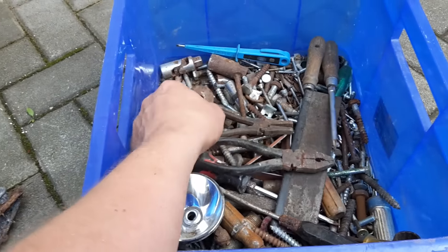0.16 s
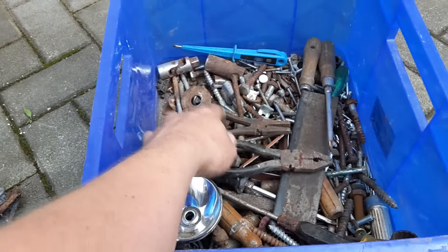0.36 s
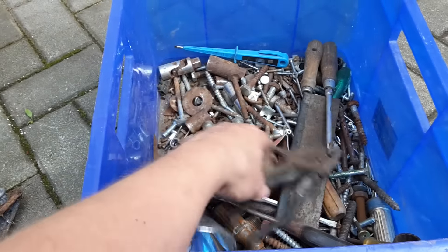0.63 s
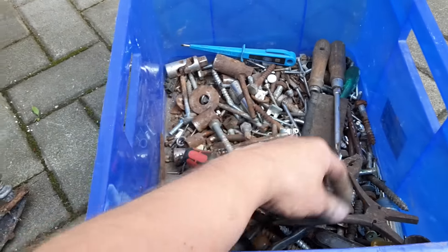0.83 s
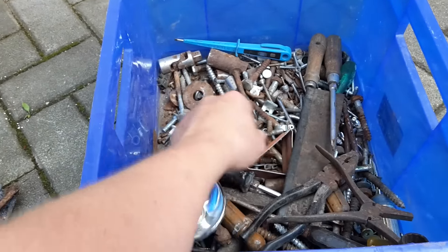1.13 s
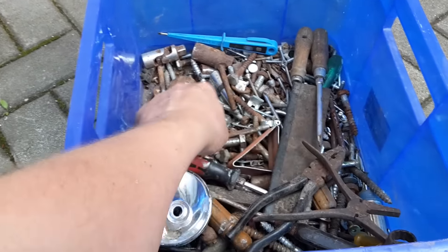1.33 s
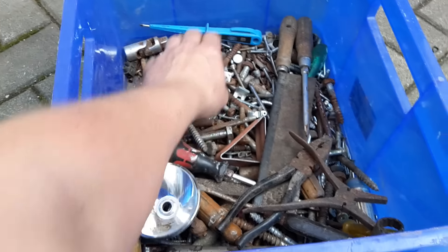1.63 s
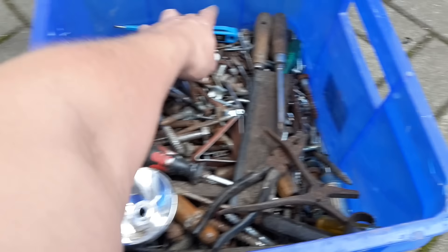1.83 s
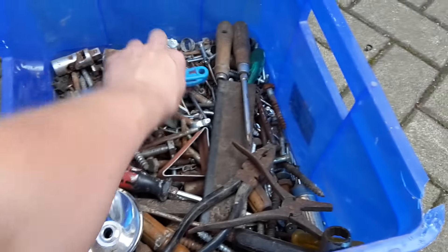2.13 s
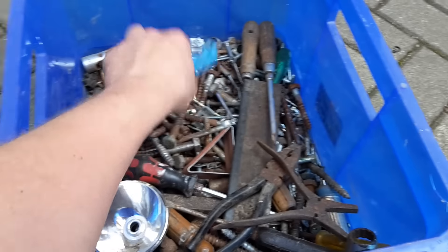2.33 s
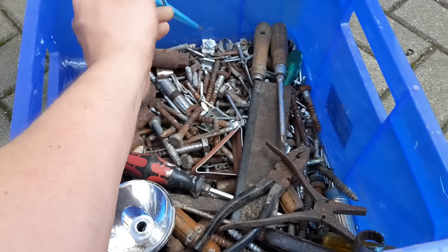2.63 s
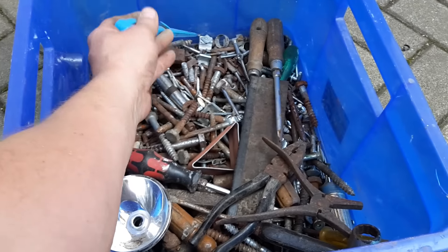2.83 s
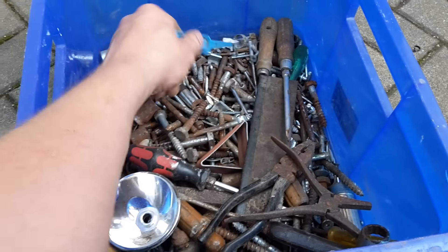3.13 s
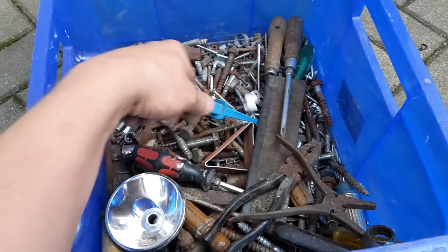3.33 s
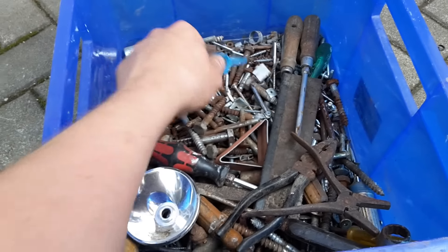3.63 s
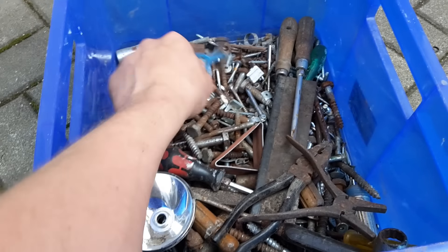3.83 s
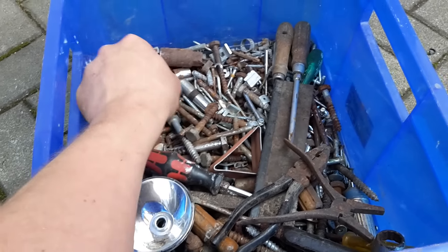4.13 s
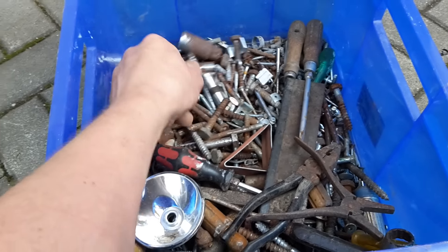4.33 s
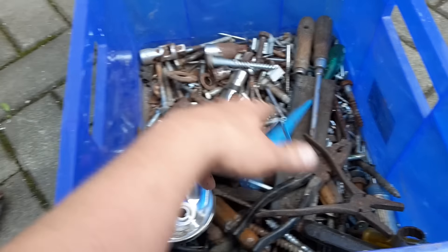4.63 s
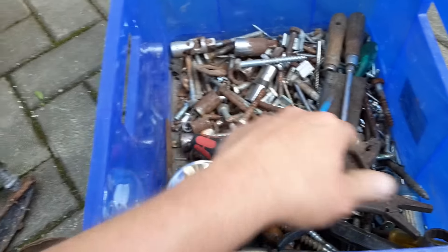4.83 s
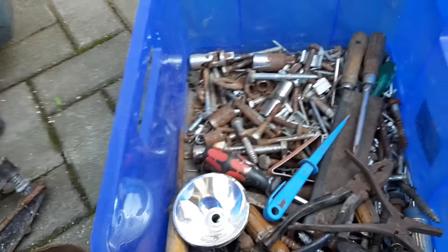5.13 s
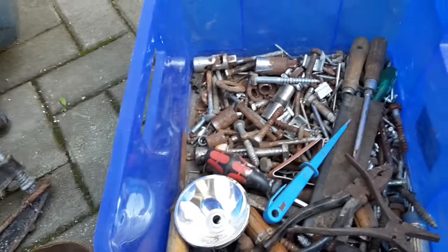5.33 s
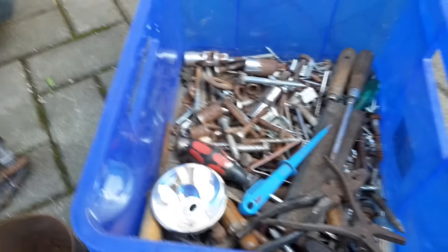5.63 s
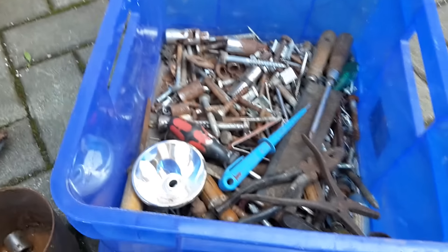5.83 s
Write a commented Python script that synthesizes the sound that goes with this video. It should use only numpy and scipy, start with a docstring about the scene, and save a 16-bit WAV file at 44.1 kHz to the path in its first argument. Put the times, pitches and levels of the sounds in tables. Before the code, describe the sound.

Close bursts of bright metal clinking and dull plastic thuds as someone digs through a crate of screws and tools outdoors.

```python
"""Steel screws clink and a plastic crate thuds as a hand rummages through bolts and old tools, close by,
outdoors. Each hit rings a small part, a tool and the heap beneath; each stroke of the hand sets off
hundreds of tiny contacts. Dropped pliers rattle and rock, and a few loose pieces ring on.
Under it lie a faint hum, low rumble and thin hiss, with two very faint far notes near the end."""
import sys
import numpy as np
from scipy import signal
from scipy.fft import rfft, irfft, next_fast_len
from scipy.io import wavfile

SR = 44100
rng = np.random.default_rng(int(sys.argv[2]) if len(sys.argv) > 2 else 0)


def master(y):
    """Save y as 16-bit WAV."""
    cut = np.clip(np.atleast_2d(y).T, -1, 1)
    pcm = np.round(cut * 32767)  # scale
    wavfile.write(sys.argv[1], SR, pcm.astype(np.int16))


N = 263277
TIME_S = np.arange(N) / SR


def amp(db):
    return 10 ** (np.asarray(db) / 20)


def unit_rms(x):
    return x / np.sqrt(np.mean(x ** 2) + 1e-20)


def at_hz(curve, hz):
    """Curve value on a log-frequency axis."""
    knots_hz, values = np.transpose(curve)
    return np.interp(np.log(hz + 1), np.log(knots_hz + 1), values)


def pan(db):
    """Stereo gains for a left-minus-right level."""
    gains = amp([[db / 2], [-db / 2]])
    return gains / gains.mean()


def add(mix, start_s, sound):
    span = mix[:, max(round(start_s * SR), 0):][:, :sound.shape[1]]
    span += sound[:, :span.shape[1]]


def highpass(x, hz):
    return signal.sosfilt(signal.butter(2, hz, "high", fs=SR, output="sos"), x)


def drift(per_s):
    """Straight lines between Gaussian random values."""
    knots = rng.standard_normal(4000)
    return np.interp(TIME_S * per_s, np.arange(len(knots)), knots)


def noise(spectrum, channels=2):
    """Steady shaped noise, unit rms."""
    size = next_fast_len(N)
    white = rfft(rng.standard_normal((channels, size)))
    gains = amp(at_hz(spectrum, np.fft.rfftfreq(size, 1 / SR)))
    return unit_rms(irfft(white * gains, size)[:, :N])


# far notes: (start [s], length [s], base pitch [Hz], peak level [dB])
FAR_NOTES = [(5.072, 0.71, 5950, -87), (5.336, 0.34, 4940, -94.5)]
def far_whistle(waver=0.0065, arch=0.068):
    """Thin, unsteady notes; pitch and level rise toward the middle of each."""
    out = np.zeros(N)
    for start_s, length_s, hz, db in FAR_NOTES:
        progress = np.clip((TIME_S - start_s) / length_s, 0, 1)
        pitch_hz = hz * (1 + waver * drift(per_s=46) + arch * np.sin(np.pi * progress))
        swell = np.sqrt(np.interp(progress, [0, 0.5, 1], [0, 1, 0]))
        out += amp(db) * swell * np.sin(2 * np.pi * np.cumsum(pitch_hz) / SR)
    return out


# hiss spectrum: (frequency [Hz], relative level [dB])
HISS_SPECTRUM = [(6000,-18.5),(8500,-25.5),(9700,5.5),(11500,2.5),(13500,-8),(15500,-9.5)]
# hiss envelope: (time [s], level [dB])
HISS_ENVELOPE = [(0, -91.5), (.3, -75.5), (0.498, -81.5), (1.85, -75.5), (2.1, -67.5), (2.68, -65.5),
                 (2.751, -59), (2.86, -73), (3.7, -67), (4.25, -93.5), (4.6, -79), (5.05, -67),
                 (5.24, -57.5), (5.38, -60.5), (5.44, -66), (5.8, -74), (5.97, -54.5)]
def hiss(gain_db=-1):
    """Thin, grainy hiss that swells and flutters."""
    flutter_db = 2 * drift(per_s=25) + 2 * drift(per_s=400)
    swell_db = np.interp(TIME_S, *np.transpose(HISS_ENVELOPE))
    return noise(HISS_SPECTRUM) * amp(gain_db + swell_db + flutter_db)


# hum tones: (frequency [Hz], relative level [dB])
HUM_TONES = [(59.2, -72.5), (123.8, -68.5), (199.2, -69), (220.7, -61.5), (581.4, -77), (662.1, -83),
             (1109, -81.5)]
# rumble spectrum: (frequency [Hz], relative level [dB])
RUMBLE_SPECTRUM = [(22,-27.5),(38,-11.5),(52,-1.5),(100,-6),(150,-4.5),(230,-4),(400,-11.5),(600,-18),(850,-26),(1100,-24),(1500,-34.5),(2300,-35),(3400,-52.5),(7000,-79.5)]
# envelope of both: (time [s], gain [dB])
HUM_ENVELOPE = [(0, -70), (.35, -62.5), (.9, -61), (1.2, -60), (1.9, -56), (3.4, -61.5), (3.7, -66),
                (4.25, -71), (5.05, -60.5), (5.97, -54)]
def distant_hum(tone_gain_db=59, waver_rad=0.5):
    """Wavering tones in low rumble; both swell and sink slowly."""
    hum = np.zeros(N)
    for hz, db in HUM_TONES:
        phase = 2 * np.pi * hz * TIME_S + waver_rad * drift(per_s=4.9)
        hum += amp(db + tone_gain_db) * np.sqrt(2) * np.sin(phase)
    rumble = noise(RUMBLE_SPECTRUM, channels=1) + 0.22 * noise(RUMBLE_SPECTRUM)
    swell_db = np.interp(TIME_S, *np.transpose(HUM_ENVELOPE))
    return (hum + rumble) * amp(swell_db) * pan(db=-3)


def echoes(x, t60_s, gain_db, low_cut_hz):
    """Sparse reflections of random sign, different at each microphone."""
    t = np.arange(SR // 2) / SR
    signs = rng.choice([-1., 1.], (2, len(t)))
    arrives = (rng.random((2, len(t))) < 0.08) & (t > 0.002)
    taps = signs * arrives * amp(-60 * t / t60_s)
    taps /= np.linalg.norm(taps, axis=1, keepdims=True)
    return amp(gain_db) * signal.fftconvolve(highpass(x, low_cut_hz), taps, axes=1)[:, :N]


# mode spread between microphones: (frequency [Hz], rms phase difference [rad])
MIC_SPREAD = [(100,.2),(450,.22),(800,.9),(1400,1.4),(4000,1.8),(11000,2.4)]
def modes(hz, t60_s, sizes, block=112):
    """Decaying sines, block**2 samples long; phase and strength differ at each microphone."""
    poles = 2j * np.pi * hz - np.log(1000) / np.maximum(t60_s, 0.004)
    imbalance, lead_rad = at_hz(MIC_SPREAD, hz) * rng.standard_normal((2, len(hz)))
    mic_gains = sizes * np.exp(0.5 * np.outer([1, -1], 0.35 * imbalance + 1j * lead_rad))
    steps = np.outer(np.arange(block) / SR, poles)
    block_starts = mic_gains[:, None] * np.exp(steps * block)
    return (block_starts @ np.exp(steps).T).imag.reshape(2, -1)


def part(spectrum, t60_s, count, main_hz=1000., main_gain=0.):
    """Irregular object: modes scattered under a spectrum, decays around t60_s, optional main mode."""
    low_hz, high_hz = spectrum[0][0], spectrum[-1][0]
    hz = low_hz + (high_hz - low_hz) * (np.arange(count) + rng.random(count)) / count
    life = np.exp(rng.uniform(-0.94, 1.0, count))  # the support damps some modes
    sizes = amp(at_hz(spectrum, hz)) * rng.standard_normal(count) / np.sqrt(life)
    sizes /= np.linalg.norm(sizes)
    return modes(np.append(hz, main_hz), t60_s * np.append(life, 1.3), np.append(sizes, main_gain))


def struck(body, rise_s, gap_s, rebounds, attack_samples=260):
    """One contact plus irregular, fading rebounds; unit rms over the attack."""
    body = body * (1 - np.exp(-np.arange(body.shape[1]) / (SR * rise_s)))
    gaps, forces = rng.uniform(0.2, 1.4, (2, rebounds))
    forces *= 0.73 ** np.arange(1, rebounds + 1)
    out = body.copy()
    for delay_s, force in zip(np.cumsum(gaps) * gap_s, forces):
        add(out, delay_s, force * body)
    return out / np.sqrt(np.mean(out[:, :attack_samples] ** 2))


# hand strokes: (touch [s], full push [s], release [s], jingle [dB], grind [dB], rumble [dB], scrape [dB])
STROKES = [(0.148, 0.163, 0.25, -69, -52, -51, -56), (.57, 0.637, 0.68, -52, -55, -48, -52),
           (.7, 0.79, 1, -49, -51, -51, -63.5), (1.967, 2.126, 2.15, -43, -44, -39.5, -61),
           (2.171, 2.258, 2.397, -39, -44, -46, -46), (2.9, 2.913, 2.894, -55, -69.5, -52.5, -69.5),
           (3.19, 3.353, 3.468, -39, -53.5, -54, -55.5), (3.797, 3.943, 3.964, -42.5, -49.5, -46.5, -60),
           (4.331, 4.527, 4.6, -37, -45.5, -40.5, -54), (4.66, 4.68, 4.96, -68.5, -54, -50, -69.5)]
def contacts(spectrum, stroke_db, push_slope, t60_s, per_s, rise_s, spread_db, count=32):
    """Many tiny contacts per stroke: the push builds and holds, then the heap settles."""
    build_db, settle_db_per_s, settle_s = 16, 128, 0.22
    hits = [struck(part(spectrum, t60_s, count=24), rise_s, gap_s=0.0024, rebounds=2)[:, :SR // 12]
            for _ in range(count)]
    hits = [hit / np.linalg.norm(hit) for hit in hits]
    out = np.zeros((2, N))
    for (touch_s, full_s, release_s, *_), db in zip(STROKES, stroke_db):
        slots_s = np.arange(touch_s, release_s + settle_s, 1 / per_s)
        late, pick, force = np.random.default_rng(rng.integers(1 << 30)).random((len(slots_s), 3)).T
        times_s = slots_s + late * 2 / per_s
        push_db = np.interp(times_s, [touch_s, full_s], [-build_db, 0])
        push_db -= settle_db_per_s * np.maximum(times_s - release_s, 0)
        sizes = unit_rms(amp(spread_db * force ** 2)) * amp(db + push_slope * push_db)
        for time_s, size, k in zip(times_s, sizes, (pick * count).astype(int)):
            add(out, time_s, hits[k] * size * np.sqrt(2 * SR / per_s))
    return out


# spectra of the struck objects: (frequency [Hz], relative level [dB])
SCREW_SPECTRUM = [(7500,-45.5),(8700,-11),(9700,3),(11500,2),(12800,-2.5),(14000,-7.5),(15400,-5.5),(16400,-30)]
TOOL_SPECTRUM = [(2800,6.5),(3700,-1.5),(4500,0.5),(5200,-3.5),(6000,-1.5),(7200,-2.5),(8500,11.5)]
HEAP_SPECTRUM = [(650,-2),(950,4.5),(1350,8),(1900,2),(2600,1),(3300,-20.5)]
CRATE_SPECTRUM = [(70,-13),(100,4),(180,2.5),(290,8.5),(420,-2.5),(560,-2),(800,-12)]
def stirring():
    """Screws jingle, tools scrape, threads and rust grind, and the crate rumbles along."""
    jingle_db, grind_db, rumble_db, scrape_db = np.transpose(STROKES)[3:]
    jingle = contacts(SCREW_SPECTRUM, jingle_db + 1, push_slope=1.5,
                      t60_s=0.03, per_s=220, rise_s=0.0003, spread_db=19)
    scrape = contacts(TOOL_SPECTRUM, scrape_db - 1, push_slope=1.8,
                      t60_s=0.03, per_s=300, rise_s=0.0004, spread_db=15)
    grind = contacts(HEAP_SPECTRUM, grind_db + 1, push_slope=1,
                     t60_s=0.016, per_s=320, rise_s=0.0005, spread_db=17)
    rumble = contacts(CRATE_SPECTRUM, rumble_db - 2, push_slope=0.86,
                      t60_s=0.06, per_s=120, rise_s=0.003, spread_db=11)
    return jingle + scrape * pan(db=-5) + grind * pan(db=-7) + rumble * pan(db=-2)


# wall spectrum: (frequency [Hz], relative level [dB])
WALL_SPECTRUM = [(420,-1),(560,-5.5),(720,-10),(1000,1),(1300,0.5),(1700,-9.5),(2300,-15.5),(3000,-25.5)]
# crate modes: (frequency [Hz], relative level [dB], t60 [s])
CRATE_MODES = [(98,-12,0.2),(316,-6,0.13),(341,-7,0.11),(556.5,-14.5,0.097)]
# blows on the crate: (time [s], thud level [dB], panel mode [Hz], wall clack level [dB])
CRATE_BLOWS = [(0.144, -36.5, 219, -68.5), (0.17, -32, 256, -52), (.867, -25.5, 418, -25.5),
               (.876, -26, 580, -32), (0.903, -40.5, 281.5, -36), (1.909, -24.5, 173.5, -49),
               (1.99, -28, 275, -51.5), (2.025, -28, 289, -36.5), (2.04, -37, 317, -32.5),
               (2.315, -31.5, 314, -38), (2.902, -30, 288, -44.5), (2.935, -32, 305.6, -37.5),
               (3.193, -35, 237, -37), (3.975, -32, 256, -48.5), (4.063, -42.5, 264, -52),
               (4.491, -38, 287, -59), (4.51, -25.5, 191, -33.5), (4.727, -27.5, 278.5, -44),
               (5.079, -56.5, 223, -45), (5.159, -60.5, 207.2, -46.5)]
def crate_knocks(thud_gain_db=-3.5, wall_gain_db=-4.5):
    """Heavy pieces hit the plastic floor, which thuds while the walls give a dull clack."""
    out = np.zeros((2, N))
    mode_hz, mode_db, mode_t60_s = np.transpose(CRATE_MODES)
    for time_s, thud_db, panel_hz, clack_db in CRATE_BLOWS:
        floor = part(CRATE_SPECTRUM, t60_s=0.054, count=22, main_hz=panel_hz, main_gain=1.4)
        floor += modes(mode_hz, mode_t60_s, amp(mode_db))
        thud = struck(floor, rise_s=0.00051, gap_s=0.00012, rebounds=1, attack_samples=440)
        wall = part(WALL_SPECTRUM, t60_s=0.039, count=44)
        clack = struck(wall, rise_s=0.00035, gap_s=0.0025, rebounds=3)
        blow = amp(thud_db + thud_gain_db) * thud * pan(db=-2)
        blow += amp(clack_db + wall_gain_db) * clack * pan(db=-7.5)
        add(out, time_s, highpass(blow, 0.36 * panel_hz))  # a small panel radiates little bass
    return out


# clack and jaw-tick spectra: (frequency [Hz], relative level [dB])
PLIERS_SPECTRUM = [(700, -11), (950, 3.5), (1300, 5), (1700, -11), (2300, -17)]
JAW_SPECTRUM = [(5300, -5), (6200, 16), (7500, -3), (9500, 16.5), (11500, 8.5), (14500, -21)]
# taps on the tools beneath: (time [s], level [dB])
PLIERS_TAPS = [(.928, -39), (0.95, -34.5), (.98, -49), (1.009, -35), (1.024, -33), (1.046, -38),
               (1.11, -42.5), (1.144, -44.5), (1.183, -54.5), (1.272, -55), (1.438, -59.5), (1.454, -52.5),
               (1.568, -54.5), (1.702, -59), (1.817, -57)]
def pliers(tick_gain_db=-11, tick_slope=1.37, t60_s=0.018, clack_cutoff_hz=2500):
    """Dropped pliers rattle, then rock gently: dull clacks, with a bright tick that favours hard taps."""
    clacks, ticks = np.zeros((2, 2, N))
    tap = dict(rise_s=0.00072, gap_s=0.001, rebounds=2)
    body = unit_rms(part(PLIERS_SPECTRUM, t60_s, count=36))
    hardest_db = max(db for _, db in PLIERS_TAPS)
    for time_s, db in PLIERS_TAPS:
        variation = unit_rms(part(PLIERS_SPECTRUM, t60_s, count=36))
        add(clacks, time_s, amp(db) * struck(body + variation, **tap))
        tick_db = hardest_db + tick_slope * (db - hardest_db) + tick_gain_db
        add(ticks, time_s, amp(tick_db) * struck(part(JAW_SPECTRUM, t60_s, count=48), **tap))
    dull = signal.sosfilt(signal.butter(4, clack_cutoff_hz, fs=SR, output="sos"), clacks)
    return dull * pan(db=-8.5) + ticks * pan(db=-11.5)


# free-lying pieces: (time [s], frequency [Hz], level [dB], t60 [s])
LOOSE_RINGS = [(.166, 11000, -31, 0.18), (.635, 6190, -31.5, 0.06), (.853, 7330, -40, 0.23),
               (.867, 453, -22, 0.045), (.887, 3047, -31, 0.055), (.951, 11580, -30, 0.13),
               (1.455, 14850, -59.5, .35), (1.455, 12450, -54.5, 0.11), (1.455, 8180, -67, 0.12),
               (1.455, 4980, -81, .15), (2.144, 11030, -23.5, 0.21), (2.215, 12245, -26, 0.15),
               (2.216, 13110, -21, 0.15), (2.286, 4318, -37.5, 0.37), (2.308, 11850, -13.5, 0.071),
               (2.384, 14740, -47, .15), (2.452, 4950, -45.5, 0.078), (3.33, 12870, -29, 0.22),
               (3.37, 4130, -47, 0.11), (3.39, 4860, -42.5, 0.095), (3.438, 12530, -30.5, 0.21),
               (3.532, 8446, -67.5, .7), (4.025, 15000, -36.5, 0.16), (4.364, 5310, -63.5, 1),
               (4.622, 8280, -39, 0.53), (4.823, 2857, -29.5, 0.085), (4.869, 2784, -34.5, 0.042),
               (4.919, 11070, -32, 0.16), (4.92, 4607, -30.5, 0.035), (4.973, 4650, -47.5, 0.032),
               (5.077, 2805, -46, 0.026)]
def loose_pieces(left_lag_rad=0.85):
    """Washers, bolts and tools ring on in single clear modes, reaching the right microphone first."""
    out = np.zeros((2, N))
    t = np.arange(SR // 2) / SR
    for time_s, hz, db, t60_s in LOOSE_RINGS:
        phase = np.maximum(2 * np.pi * hz * t - [[left_lag_rad], [0]], 0)
        add(out, time_s, amp(db - 60 * t / t60_s) * np.sin(phase))
    return out


# steel-on-steel hits: (time [s], clink level [dB], main mode [Hz], heap clack level [dB], clink pan [dB])
STEEL_HITS = [(0.146, -29, 10630, -49.5, 1), (0.167, -22.5, 9600, -39, -20), (.178, -21, 11800, -39, 0),
              (0.2053, -22.5, 11000, -41.5, -3), (.233, -16, 9720, -47, -9),
              (.2495, -21.5, 11000, -39.5, 1.5), (0.3403, -50, 10900, -60, -2),
              (.385, -51.5, 11000, -58, -4), (.427, -55.5, 10800, -67.5, -5),
              (.554, -35.5, 11000, -47, -10), (.578, -33, 11000, -46, -1),
              (0.6015, -30.5, 11100, -42, -4.5), (0.619, -24.5, 10740, -41, -0.5),
              (0.635, -18, 11100, -38.5, -4.5), (0.644, -19.5, 10400, -40, -3.5),
              (0.66, -22, 10800, -48, -5), (0.71, -27, 10740, -39.5, 6.5), (.758, -27.5, 10800, -36.5, -1),
              (0.823, -22.5, 11400, -35.5, -1.5), (0.8515, -21, 10640, -42, -10),
              (.8676, -22.5, 11150, -25, 1.5), (0.885, -17, 10120, -30.5, -5.5),
              (0.95, -22, 11550, -67, -5), (1.025, -24.5, 9300, -58.5, -4.5),
              (2.007, -32, 10540, -64, -5.5), (2.0542, -30.5, 9940, -49.5, 12.5),
              (2.095, -7, 11650, -47, 7), (2.1272, -21, 11700, -40, -4.5), (2.144, -14, 11000, -42, -3.5),
              (2.1614, -14.5, 11000, -38, -7), (2.216, -13.5, 12540, -48, -2),
              (2.2342, -11, 12400, -45, -8.5), (2.266, -16, 11300, -66, 1),
              (2.2852, -10.5, 11030, -37, 1.5), (2.31, -11.5, 11100, -31.5, -2.5),
              (2.322, -16.5, 11000, -40, 6.5), (2.36, -16.5, 12160, -39, 1.5),
              (2.383, -15.5, 11200, -51, -10), (2.404, -15.5, 11700, -56, -1),
              (2.5443, -11, 11730, -39, -4.5), (3.1856, -22, 10600, -61, 0),
              (3.1974, -31, 10420, -52.5, -25), (3.3312, -43, 12570, -43, -2.5),
              (3.3693, -13, 12600, -41.5, 10.5), (3.3896, -10.5, 12650, -37.5, -4.5),
              (3.407, -14, 11800, -38, -1.5), (3.4362, -13.5, 12550, -38, -2),
              (3.5326, -17, 9630, -52.5, -1.5), (3.5593, -30.5, 9800, -63, -5),
              (3.6467, -43.5, 10000, -46.5, -14), (3.8107, -26.5, 9500, -54.5, -5),
              (3.8744, -20.5, 9590, -49.5, -8), (3.9928, -17.5, 9680, -48, -11),
              (3.997, -16, 11950, -42.5, 12.5), (4.0264, -21, 9400, -64, -6.5),
              (4.0483, -26.5, 14000, -58, -1.5), (4.325, -42.5, 13300, -56.5, -8),
              (4.36, -31.5, 12000, -50, 8), (4.3812, -54, 10360, -46, -19),
              (4.5285, -16, 9590, -37.5, -16.5), (4.547, -19, 12760, -35.5, 2), (4.699, -9, 10460, -45, -5),
              (4.7032, -18, 10750, -40, 11.5), (4.7272, -20.5, 8400, -39, -9), (4.7605, -24, 11000, -41, 0),
              (4.8, -40, 8950, -44.5, -8), (4.8218, -10, 10390, -33, -5.5), (4.866, -29, 11030, -45.5, 7.5),
              (4.9176, -17, 10990, -34, -7.5)]
def steel_clinks(clink_gain_db=-9, ping_gain_db=-9.5, clack_gain_db=1):
    """Each collision rings a small part, the tool it touches and the heap beneath."""
    out = np.zeros((2, N))
    for time_s, clink_db, hz, clack_db, pan_db in STEEL_HITS:
        screw = part(SCREW_SPECTRUM, t60_s=0.023, count=72, main_hz=hz, main_gain=0.65)
        clink = struck(screw, rise_s=0.0004, gap_s=0.0018, rebounds=7)
        tool = part(TOOL_SPECTRUM, t60_s=0.022, count=52)
        ping = struck(tool, rise_s=0.0012, gap_s=0.0023, rebounds=7)
        heap = part(HEAP_SPECTRUM, t60_s=0.023, count=44)
        clack = struck(heap, rise_s=0.0005, gap_s=0.001, rebounds=3)
        ping_db = 0.41 * clink_db + 0.7 * clack_db
        add(out, time_s, amp(clink_db + clink_gain_db) * clink * pan(pan_db))
        add(out, time_s, amp(ping_db + ping_gain_db) * ping * pan(db=-2.5))
        add(out, time_s, amp(clack_db + clack_gain_db) * clack * pan(db=-5.5))
    return out


def scene():
    """Rummaging, its shimmer in the heap, scatter off the crate walls, an outdoor tail, background."""
    rummage = steel_clinks() + crate_knocks() + pliers() + loose_pieces() + stirring()
    shimmer = echoes(rummage, t60_s=0.047, gain_db=-20, low_cut_hz=4500)
    walls = echoes(rummage, t60_s=0.06, gain_db=-12, low_cut_hz=600)
    yard = echoes(rummage, t60_s=0.2, gain_db=-10, low_cut_hz=288)
    return rummage + shimmer + walls + yard + distant_hum() + hiss() + far_whistle()


def record(dry):
    """Microphone band: 45 Hz to 16.2 kHz."""
    lowpass = signal.firwin(201, 16200, window=("kaiser", 8), fs=SR)
    return signal.oaconvolve(highpass(dry, 45), lowpass[None], "same")


dry = scene()
out = record(dry)
master(out)
```